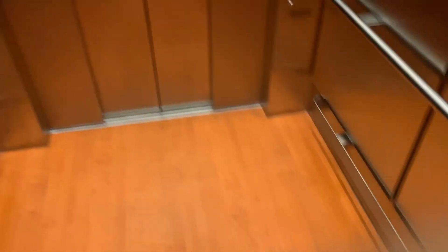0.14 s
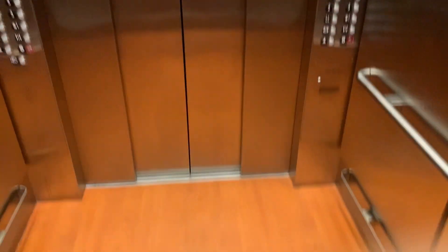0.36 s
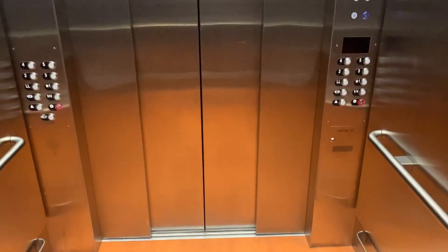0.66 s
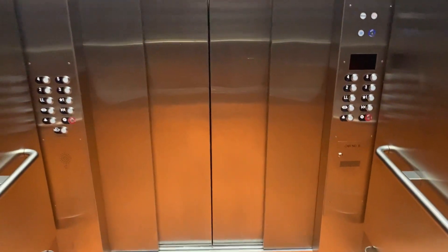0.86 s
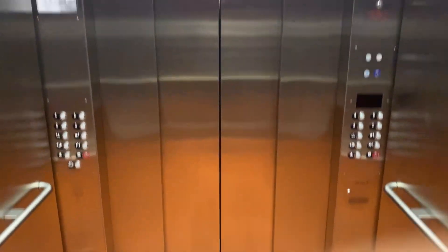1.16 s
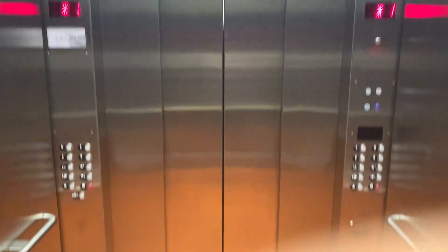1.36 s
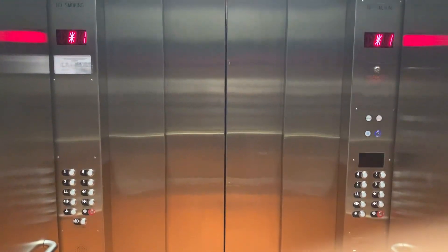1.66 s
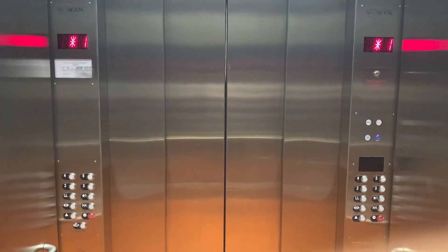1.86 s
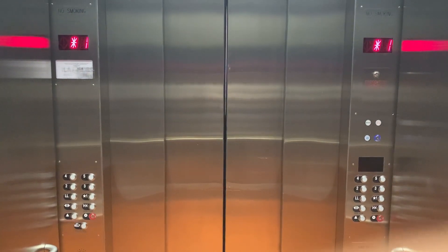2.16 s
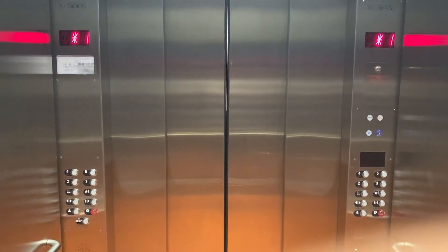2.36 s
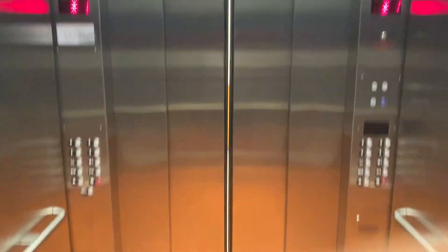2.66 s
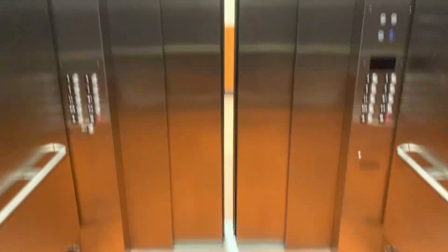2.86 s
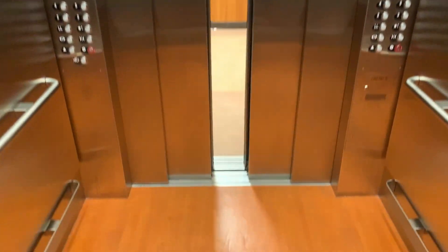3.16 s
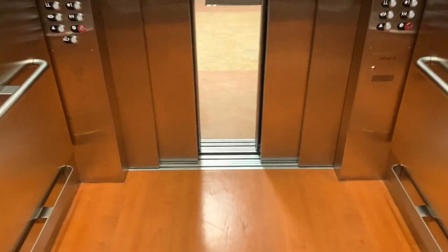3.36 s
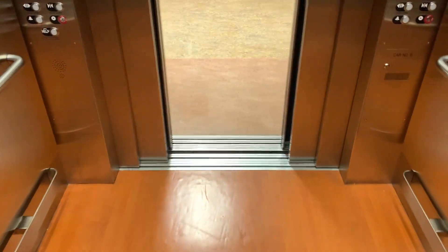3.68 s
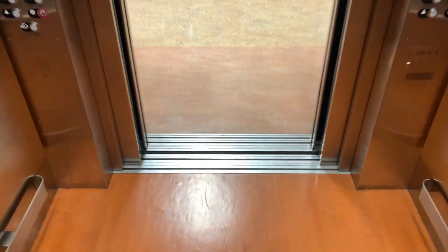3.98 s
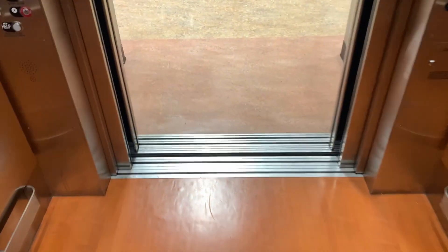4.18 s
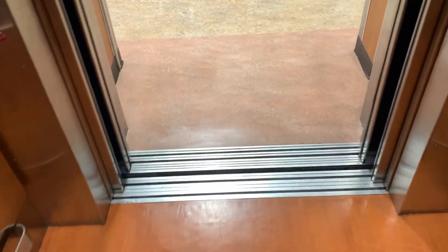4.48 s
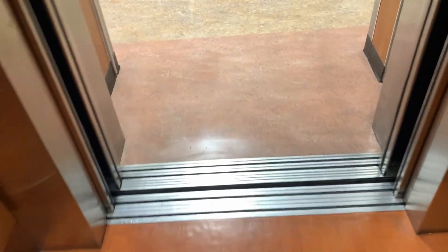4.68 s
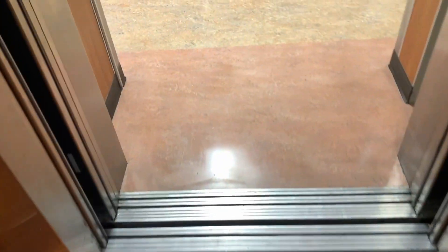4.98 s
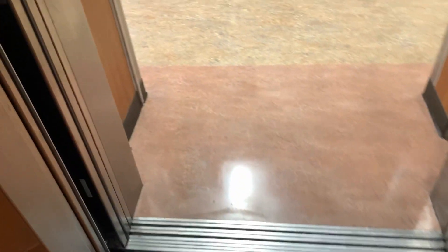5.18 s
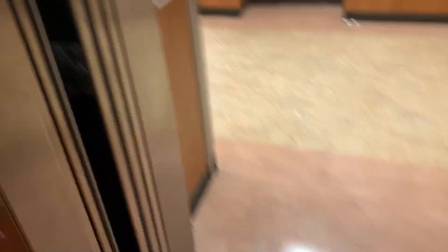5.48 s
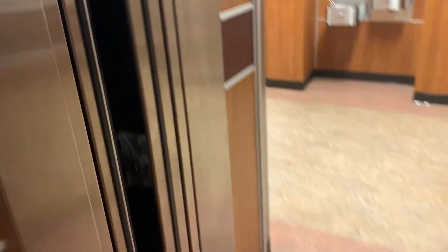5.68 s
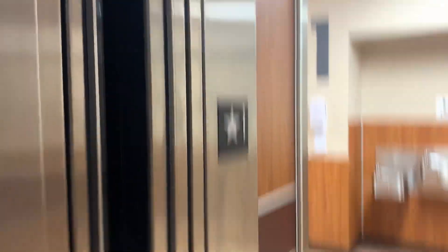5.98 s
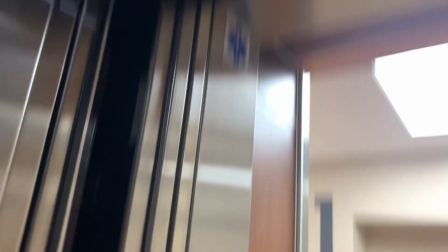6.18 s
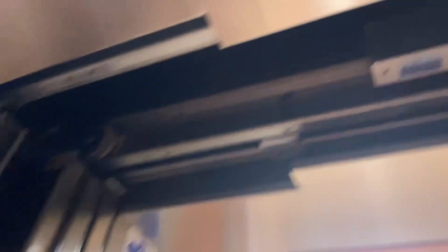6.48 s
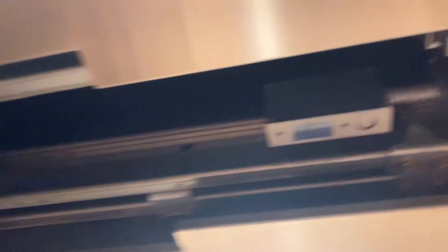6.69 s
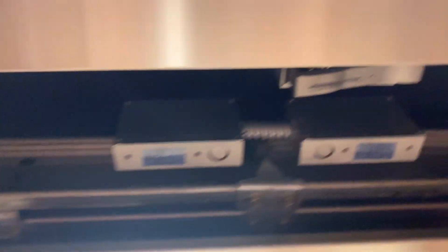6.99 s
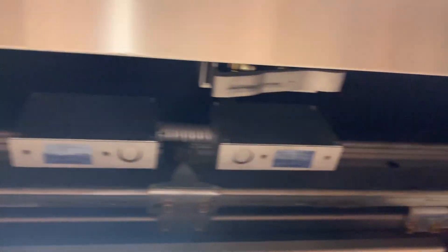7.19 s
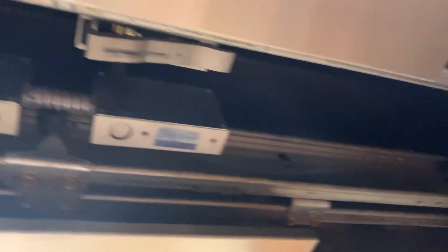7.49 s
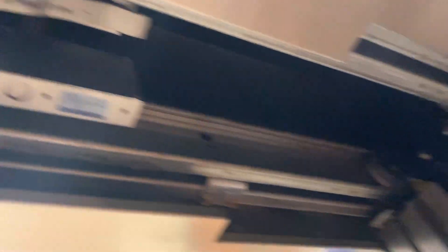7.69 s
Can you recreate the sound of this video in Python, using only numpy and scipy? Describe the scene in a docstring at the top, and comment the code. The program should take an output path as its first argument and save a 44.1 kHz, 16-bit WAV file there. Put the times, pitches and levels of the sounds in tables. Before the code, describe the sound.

Heard from inside an elevator, soft cloth rustles pass over a constant hum and rush of air. Latches click and the steel doors slide open, rumbling and rattling on their rollers, with short squeaks, ringing knocks and a low shudder. The rolling fades and ends in a sharp knock. As the microphone moves into the doorway, the air of the car gives way to that of the shaft and hall, with a soft rub and light ticks.

```python
"""Elevator doors unlatch, roll open and knock at their stops, heard from inside the steel car.
Rollers drive the panels into a roar, squeak by stick-slip friction and shake the car at its low
resonance; the guides hiss, the gear clicks, and blows ring the panel modes. A mains hum, the rush of
ventilation and a few rustles of cloth lie beneath. As the listener steps into the doorway, the
standing waves of the hum shift in balance and the air of the car gives way to that of shaft and hall."""
import sys
import numpy as np
from scipy import signal
from scipy.fft import rfft, irfft, next_fast_len
from scipy.io import wavfile
from scipy.ndimage import uniform_filter1d

SR = 44100
rng = np.random.default_rng(int(sys.argv[2]) if len(sys.argv) > 2 else 0)


def transcribe(signal):
    """Save signal, clipped to [-1, 1], as a 16-bit WAV file at the path in sys.argv[1]."""
    frames = np.atleast_2d(signal).T
    limited = np.clip(frames, -1, 1)
    pcm = np.round(limited * 32767).astype(np.int16)
    wavfile.write(sys.argv[1], SR, pcm)


N = 345838
T = np.arange(N) / SR
QUADRATURE = np.array([[0], [np.pi / 2]])  # two phases a quarter cycle apart

# hum along the listener's path: time_s, first_harmonic_db, second_harmonic_db,
# second_left_minus_right_db, second_left_lead_rad
HUM_PATH = [(0, -39, -30, -2, 0), (.4, -40, -28, -2, .1), (.8, -38, -28.5, -1, .05),
            (1.4, -39, -28, -3, .1), (2, -38, -28.5, -4, .1), (2.4, -36, -26, -4, .1),
            (2.9, -37, -24, -4, .15), (3.3, -34, -24, -4, .15), (3.7, -36, -25.5, -3, .1),
            (4.1, -37, -26, -3, .1), (4.5, -32, -25, -1, 0), (5.1, -31.5, -26.5, 0, -.05),
            (5.6, -29, -28.5, -3, .3), (6, -29, -29.5, -5, .7), (6.4, -29.5, -33, -1, .7),
            (6.8, -30.5, -34, -3, .8), (7.3, -30, -35, -6, .7), (7.84, -30, -35, -7, .4)]
# upper hum partials, by harmonic number: time_s, level_db
HUM_OVERTONES = {4: [(0, -69), (.5, -45), (1.5, -54), (3, -52.5), (4.8, -54.5), (5.6, -59), (7.84, -64.5)],
                 10: [(0, -81.5), (.6, -63), (2.5, -61.5), (2.9, -73), (7.84, -65.5)]}
# strength of the ventilation: time_s, car_db, doorway_db
AIR_LEVELS = [(0, -33, -62), (1, -34.5, -64), (2, -34.5, -60.5), (3, -34, -35), (4, -30.5, -41),
              (5, -42, -36.5), (6, -42.5, -35.5), (7, -44.5, -37), (7.84, -45.5, -37.5)]
# ventilation spectra in the car and in the doorway: frequency_hz, relative_db
CAR_AIR_SPECTRUM = [(25, -26), (45, -12.5), (75, -2.5), (100, -11.5), (120, 8), (140, -4), (170, -1.5),
                    (250, -1.5), (400, -13), (630, -17), (800, -23), (1300, -25), (2500, -31.5),
                    (4500, -41.5), (7000, -51.5), (15000, -72)]
DOORWAY_AIR_SPECTRUM = [(25, -30.5), (45, -21.5), (70, 4), (130, 1), (250, 1), (400, -12), (630, -17),
                        (800, -18), (1250, -23), (2000, -24.5), (3500, -27.5), (4500, -33.5), (7000, -42),
                        (9500, -55), (15000, -60)]
# rustles of cloth: peak_s, level_db, rise_db_per_s
CLOTH_RUSTLES = [(.1, -64.5, 45), (.33, -63.5, 60), (.495, -53, 120), (.705, -57, 450), (.76, -49, 74),
                 (5.15, -53.5, 250), (5.64, -57.5, 53), (5.84, -52.5, 45)]
# hiss of cloth, guides and clicks: frequency_hz, relative_db
HISS_SPECTRUM = [(2000, -30.5), (3000, -2.5), (4500, -3), (6500, 1.5), (8500, -0.5), (10000, -4),
                 (12000, -10.5), (13500, -11.5), (15500, -17)]
# roller squeaks and rubs: start_s, level_db, start_hz, end_hz, width_hz, rise_s, t60_s, tone_share
ROLLER_SQUEAKS = [(.24, -57, 6500, 6430, 60, 0.027, 0.55, 0.4),
                  (1.69, -62, 8200, 8270, 60, 0.073, 0.68, 0.4),
                  (1.72, -59, 6470, 6340, 60, 0.033, .6, 0.4),
                  (2.98, -40, 1460, 1740, 300, 0.026, 0.57, .2),
                  (2.96, -60, 15050, 15050, 200, .02, 0.66, .2),
                  (3.041, -34.5, 14900, 14960, 240, .001, .33, .5),
                  (3.242, -46, 14950, 14950, 240, .004, .4, .3),
                  (3.065, -41, 6800, 6860, 250, 0.0054, 0.64, 0.1),
                  (3.419, -30, 3388, 3290, 170, 0.027, 0.34, 0.45),
                  (3.45, -34, 6580, 6420, 200, .015, 0.24, 0.1),
                  (3.82, -52, 15200, 15200, 151, .01, .3, .3), (3.99, -44, 3200, 3220, 200, .01, 0.27, 0.5),
                  (4.675, -42, 1760, 1800, 150, .01, 0.42, 0.3),
                  (4.678, -49.5, 3940, 3930, 200, 0.0085, 0.39, .2),
                  (6.168, -48.5, 1370, 1380, 160, 0.027, 1.0, 0.03),
                  (6.195, -42.5, 1810, 1780, 150, 0.042, 0.88, 0),
                  (6.29, -47, 2220, 2260, 500, 0.021, 0.67, 0), (7.04, -66, 8130, 8200, 200, .005, .4, .3)]
# shudders of the whole car: peak_s, level_db
CAR_SHUDDERS = [(1.3, -52), (1.82, -42), (2.13, -43), (2.38, -51), (2.66, -45), (2.83, -48), (3.08, -36),
                (3.23, -40), (3.51, -31), (3.75, -34), (3.84, -28), (4.05, -43), (4.3, -39), (4.52, -50),
                (4.77, -42), (5.1, -49), (5.38, -42)]
# puffs and clicks of the door gear: start_s, treble_db, body_db, body_hz, rise_s, t60_s
GEAR_CLICKS = [(1.7885, -42, -41, 4400, 0.0086, 0.39), (1.825, -40.5, -35.5, 3880, 0.008, 0.58),
               (2.193, -55, -53, 2020, 0.01, 0.36), (2.469, -43, -57, 2400, 0.02, 0.8),
               (2.5479, -39.5, -38.5, 2500, 0.0059, 0.55), (2.738, -65.5, -50, 3610, 0.0073, 0.33),
               (3.0667, -34, -61, 2170, 0.011, 0.27), (3.625, -49, -62, 2400, .005, .4),
               (3.835, -37.5, -67, 2060, 0.0037, 0.2), (4.45, -52, -60, 2400, .015, 0.89),
               (4.668, -45.5, -41, 2140, 0.0036, 0.16), (4.722, -45.5, -50, 2470, 0.0069, 0.54),
               (5.272, -42.5, -44, 2140, 0.0042, 0.3), (5.386, -54, -56, 2400, .004, 0.3),
               (5.6498, -41.5, -32.5, 2280, 0.002, 0.33), (6.0412, -47, -47.5, 4400, 0.0027, 0.74),
               (6.539, -51, -56, 2200, 0.0044, 0.12), (7.0364, -53.5, -49, 2630, 0.0048, 0.13),
               (7.074, -67, -56, 2330, 0.008, 0.3), (7.2634, -55.5, -63, 2320, 0.0047, 0.22)]
# steady part of the rolling: time_s, low_roar_db, bright_roar_db, guide_hiss_db
ROLL_LEVELS = [(2.3, -64, -77, -85), (2.48, -51, -65, -61.5), (2.8, -49.5, -57, -58), (3.15, -43, -52, -49),
               (3.4, -44, -55.5, -53), (3.7, -35, -43.5, -47), (3.98, -35, -46, -47),
               (4.12, -41, -51.5, -54.5), (4.4, -42.5, -45.5, -52), (4.8, -45, -54, -64),
               (5.08, -48, -50, -53), (5.23, -66, -63, -68), (5.42, -55, -49.5, -75), (5.56, -73, -71, -68)]
# spectra of the two panel roars: frequency_hz, relative_db
LOW_ROAR_SPECTRUM = [(140, -18), (300, 0.5), (450, 1.5), (700, -4.5), (1150, -7), (1500, -11.5),
                     (2500, -49)]
BRIGHT_ROAR_SPECTRUM = [(900, -23), (1400, -10.5), (2000, 3), (3000, -4), (5000, -9.5), (7000, -50.5)]
# jolts in the track: peak_s, low_roar_db, bright_roar_db
TRACK_JOLTS = [(2.57, -37, -44), (2.66, -49, -44), (3.08, -41, -42.5), (3.15, -36, -55), (3.47, -43, -47),
               (3.75, -31, -39.5), (3.96, -36, -42.5), (4.3, -37.5, -43.5), (4.61, -36.5, -45.5),
               (4.93, -45, -53), (5.03, -41.5, -47), (5.281, -36, -46.5), (5.4, -46, -53)]
# normal modes of the door panels: pitch_hz, relative_db, base_t60_s
PANEL_MODES = [(330, -4, .2), (517, 0, .3), (650, -4, .25), (950, -8, .2), (1150, -8, .2), (1500, -6, .25),
               (1800, -8, .2), (2013, -10, .2), (2299, -12, .2), (2600, -11, .2), (2923, -11, .2),
               (3400, -17, .2), (4016, -18, .2)]
# blows on the panels: start_s, onset_db, focus_hz, reach_octaves, t60_factor
PANEL_KNOCKS = [(3.092, -41, 950, 0.32, 1.5), (3.639, -45, 330, .5, 1.), (3.751, -37.5, 1130, 0.4, 0.93),
                (3.79, -29, 330, .4, 1), (3.90, -32.5, 604, 2, 0.96), (4.005, -45, 1610, .2, .6),
                (4.076, -52, 350, 0.91, 0.56), (4.08, -46, 1450, 0.16, 0.81), (4.268, -42, 600, .8, 0.81),
                (4.675, -43, 1040, 0.96, 1.1), (4.58, -50, 450, .6, 0.52), (4.86, -46, 500, .6, .6),
                (5.03, -44, 550, 0.55, 0.68), (5.277, -38, 1500, 0.18, 0.39),
                (5.385, -42.5, 2430, 0.23, 0.71), (5.386, -41, 700, .45, 0.98), (5.425, -44, 620, 0.39, .6),
                (5.651, -32.5, 1900, 1.7, 0.41), (5.653, -33, 530, 0.6, 0.5), (5.71, -42, 480, .5, 0.45),
                (5.92, -51, 610, 0.26, .5), (7.041, -49, 666, 0.24, 0.96)]
# likeness of left and right: frequency_hz, coherence_ratio
STEREO_COHERENCE = [(40, .99), (100, .94), (160, .85), (270, .9), (450, .15), (1000, .1), (5000, .1),
                    (6000, .35), (7000, .93), (8000, .9), (9300, .995), (10500, .9), (11600, .995),
                    (12700, .8), (14000, .995), (15500, .8)]
# balance of left and right: frequency_hz, left_minus_right_db
STEREO_BALANCE = [(60, -0.5), (180, -2.0), (550, -0.5), (1650, 0.0), (4970, 0.0), (15000, 0.0)]


def amp(db):
    return 10 ** (np.asarray(db) / 20)


def unit_rms(x):
    return x / np.sqrt(np.mean(x ** 2) + 1e-20)


def at_frequency(points, hz):
    knots_hz, values = np.transpose(points)
    return np.interp(np.log(hz + 1), np.log(knots_hz + 1), values)


def time_curves(rows):
    time_s, *columns = np.transpose(rows)
    return [np.interp(T, time_s, column) for column in columns]


def gate(rows, fade_s=.1):
    """One inside the time span of a table, sloping to zero outside."""
    return np.clip(np.minimum(T - rows[0][0], rows[-1][0] - T) / fade_s + 1, 0, 1)


def add(mix, start_s, sound):
    part = mix[..., round(start_s * SR):][..., :sound.shape[-1]]
    part += sound[..., :part.shape[-1]]


def drift(samples):
    return unit_rms(uniform_filter1d(rng.standard_normal(N), size=samples))


def peak_db(peak_s, db, rise_db_per_s, fall_db_per_s):
    """Exponential growth and decay: straight lines in decibels that meet at a peak."""
    return db - np.maximum(rise_db_per_s * (peak_s - T), fall_db_per_s * (T - peak_s))


def swell(rise_s, t60_s):
    """Half a second of a damped response: a quick rise, then exponential decay."""
    t = T[:SR // 2]
    return (1 - np.exp(-t / rise_s)) * amp(-60 * t / t60_s)


def noise_band(samples, hz, width_hz):
    """Resonance by heterodyning: two noises are shifted down by hz, smoothed twice and shifted back."""
    carrier = np.exp(2j * np.pi * np.cumsum(hz * np.ones(samples)) / SR)
    one_pole = [1, -np.exp(-np.pi * width_hz / SR)]
    shifted = rng.standard_normal((2, samples)) / carrier
    smoothed = signal.lfilter([1], np.convolve(one_pole, one_pole), shifted)
    return unit_rms((carrier * smoothed).real)


def noise_field(spectrum, patchy_db, frame=1024):
    """Spectral shaping: two uncorrelated noises whose level drifts in patches of time and frequency."""
    hop, hz = frame // 4, np.fft.rfftfreq(frame, 1 / SR)
    re1, im1, re2, im2, patches = rng.standard_normal((N // hop + 5, len(hz), 5)).T
    patches = uniform_filter1d(patches, size=10, axis=0)
    patches = unit_rms(uniform_filter1d(patches, size=12, axis=1))
    gain = amp(at_frequency(spectrum, hz)[:, None] + patchy_db * patches)
    bins = gain * np.array([re1 + 1j * im1, re2 + 1j * im2])
    return unit_rms(signal.istft(bins, nperseg=frame, noverlap=frame - hop)[1][:, :N])


def mains_hum(pitch_hz=120.04):
    """Harmonics of twice the mains frequency form standing waves, so their levels vary with position."""
    first_db, second_db, pan_db, lead_rad = time_curves(HUM_PATH)
    phase, side = 2 * np.pi * pitch_hz * T, np.array([[.5], [-.5]])
    out = amp(first_db) * np.cos(phase + .13 * side)
    out += amp(second_db + side * pan_db) * np.cos(2 * phase + .13 + side * lead_rad)
    for harmonic, rows in HUM_OVERTONES.items():
        flutter_db = 3.3 * drift(5000)
        out += amp(time_curves(rows)[0] + flutter_db) * np.cos(harmonic * phase + 1.27 * side)
    return np.sqrt(2) * out


def ventilation():
    """Broadband flow noise: the rush of the car gives way to that of the shaft and hall."""
    car_db, doorway_db = time_curves(AIR_LEVELS)
    car = amp(car_db) * noise_field(CAR_AIR_SPECTRUM, patchy_db=2.13, frame=4096)
    doorway = amp(doorway_db) * noise_field(DOORWAY_AIR_SPECTRUM, patchy_db=2, frame=2048)
    return car + doorway


def hiss():
    return noise_field(HISS_SPECTRUM, patchy_db=1, frame=256)


def cloth_rustle():
    """Sliding friction of cloth gives brief swells of treble noise."""
    level_db = np.max([peak_db(*row, fall_db_per_s=81.5) for row in CLOTH_RUSTLES], axis=0)
    return amp(level_db) * hiss()


def roller_squeaks():
    """Stick-slip friction: a tone in a band of noise glides briefly in pitch and dies away."""
    out = np.zeros((2, N))
    for start_s, db, start_hz, end_hz, width_hz, rise_s, t60_s, tone_share in ROLLER_SQUEAKS:
        envelope = swell(rise_s, t60_s)
        hz = np.interp(T[:len(envelope)], [.02, .07], [start_hz, end_hz])
        tone = np.sqrt(2 * tone_share) * np.sin(2 * np.pi * np.cumsum(hz) / SR + QUADRATURE)
        fuzz = np.sqrt(1 - tone_share) * noise_band(len(envelope), hz, width_hz)
        add(out, start_s, amp(db) * envelope * (tone + fuzz))
    return out


def car_shudder(resonance_hz=47, waver_hz=3):
    """The moving doors excite the low resonance of the whole car, which wavers a little."""
    hz = resonance_hz + waver_hz * drift(6000)
    shudders_db = [peak_db(*row, rise_db_per_s=120, fall_db_per_s=102) for row in CAR_SHUDDERS]
    return amp(np.max(shudders_db, axis=0)) * np.sqrt(2) * np.sin(2 * np.pi * np.cumsum(hz) / SR)


def gear_clicks(split_hz=11500):
    """Impact transients: each excites a resonant band and a hiss whose top is damped sooner."""
    treble_power, top_power, body = np.zeros(N), np.zeros(N), np.zeros((2, N))
    snap = swell(.0002, .02)  # the first contact
    for start_s, treble_db, body_db, body_hz, rise_s, t60_s in GEAR_CLICKS:
        envelope, top_envelope = swell(rise_s, t60_s), swell(rise_s, .76 * t60_s)
        add(treble_power, start_s, amp(treble_db) ** 2 * (envelope ** 2 + snap ** 2))
        add(top_power, start_s, amp(treble_db) ** 2 * (top_envelope ** 2 + snap ** 2))
        add(body, start_s, amp(body_db) * envelope * noise_band(len(envelope), body_hz, width_hz=1700))
    noise = hiss()
    top = signal.sosfiltfilt(signal.butter(3, split_hz, "high", fs=SR, output="sos"), noise)
    return np.sqrt(treble_power) * (noise - top) + np.sqrt(top_power) * top + body


def track_rattle(bumps_per_s=120, split_hz=1300):
    """Impulse response: each random bump rings one panel mode; returns the low and bright parts."""
    strength_db = 3.4 * np.minimum(rng.exponential(1, N), 3)
    bumps = amp(strength_db) * (rng.random(N) < bumps_per_s / SR)
    struck_mode = rng.integers(0, 2 * len(PANEL_MODES), N)
    t, low, bright = T[:SR // 5], np.zeros((2, N)), np.zeros((2, N))
    for k, (hz, db, t60_s) in enumerate(PANEL_MODES + PANEL_MODES):  # one set a channel
        detuned_hz = hz * rng.uniform(.84, 1.07)
        ring = amp(db) * swell(.004, .93 * t60_s)[:len(t)] * np.sin(2 * np.pi * detuned_hz * t)
        band = low if hz < split_hz else bright
        band[k // len(PANEL_MODES)] += signal.oaconvolve(bumps * (struck_mode == k), ring)[:N]
    return unit_rms(low), unit_rms(bright)


def rolling_roar(rattle_db=-9.5):
    """Forced vibration: rollers shake the panels into a roar that swells at each jolt in the track."""
    low_db, bright_db, _ = time_curves(ROLL_LEVELS)
    for peak_s, jolt_low_db, jolt_bright_db in TRACK_JOLTS:
        jolt_db = peak_db(peak_s, 0, rise_db_per_s=213, fall_db_per_s=105)
        low_db = np.maximum(low_db, jolt_db + jolt_low_db)
        bright_db = np.maximum(bright_db, jolt_db + jolt_bright_db)
    low_rattle, bright_rattle = track_rattle()
    low = noise_field(LOW_ROAR_SPECTRUM, patchy_db=3) + amp(rattle_db) * low_rattle
    bright = noise_field(BRIGHT_ROAR_SPECTRUM, patchy_db=2) + amp(rattle_db) * bright_rattle
    return gate(ROLL_LEVELS) * (amp(low_db) * low + amp(bright_db) * bright)


def guide_hiss():
    """Sliding friction in the guides gives treble noise while the doors move."""
    _, _, level_db = time_curves(ROLL_LEVELS)
    return gate(ROLL_LEVELS) * amp(level_db) * hiss()


def panel_knocks(rise_s=.0035):
    """Modal ringing: a blow excites beating pairs of modes, most near the frequency its spot favours."""
    out, t = np.zeros((2, N)), T[:SR // 2]
    for start_s, onset_db, focus_hz, reach_octaves, t60_factor in PANEL_KNOCKS:
        knock = 0
        for hz, mode_db, t60_s in PANEL_MODES:
            phase, beat_hz = 2 * np.pi * rng.random() + QUADRATURE, rng.uniform(20, 60)
            pair = np.sin(2 * np.pi * hz * t + phase)
            pair += .63 * np.sin(2 * np.pi * (hz + beat_hz) * t + phase)
            off_focus_db = 9.2 * (np.log2(hz / focus_hz) / reach_octaves) ** 2
            knock = knock + amp(mode_db - off_focus_db) * swell(rise_s, t60_s * t60_factor) * pair
        onset_rms = np.sqrt(np.mean(knock[:, :1000] ** 2))
        add(out, start_s, amp(onset_db) * knock / onset_rms)
    return out


def car_reverberation(direct, level_db=-7):
    """Dense reflections in the steel car add an exponentially decaying tail."""
    tail = rng.standard_normal((2, SR // 2)) * swell(rise_s=.0097, t60_s=.76)
    tail /= np.linalg.norm(tail[0])
    return direct + amp(level_db) * signal.fftconvolve(direct, tail, axes=1)[:, :N]


def stereo_image(pair, treble_lag_s=1 / 4650):
    """Partial coherence of left and right: bass alike, middle diffuse, treble alike but late at left."""
    size = next_fast_len(N)
    hz = np.fft.rfftfreq(size, 1 / SR)
    common, independent = rfft(pair, size)
    coherence = at_frequency(STEREO_COHERENCE, hz)
    balance = amp(at_frequency(STEREO_BALANCE, hz) / 2)
    lag_s = treble_lag_s * at_frequency([(1000, 0), (4000, 1)], hz)
    left = common * np.exp(-2j * np.pi * hz * lag_s) * balance
    right = (coherence * common + np.sqrt(1 - coherence ** 2) * independent) / balance
    return irfft([left, right], size)[:, :N]


def scene():
    """Superposition: hum and shudder add to the partly coherent sound of air, cloth and doors."""
    tones = mains_hum() + car_shudder()
    air = ventilation()
    doors = rolling_roar() + gear_clicks() + car_reverberation(panel_knocks())
    doors += roller_squeaks() + guide_hiss()
    return tones + stereo_image(air + doors + cloth_rustle())


def record(dry):
    """Band limiting: a steep low-pass filter removes the highest treble."""
    lowpass = signal.firwin(1023, cutoff=15650, window=("kaiser", 9), fs=SR)
    return signal.oaconvolve(dry, lowpass[None], "same")


dry = scene()
out = record(dry)
transcribe(out)
```